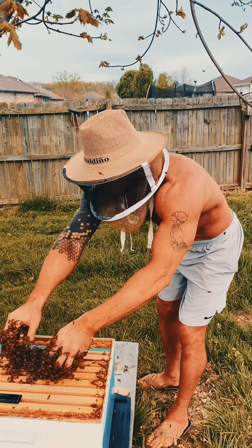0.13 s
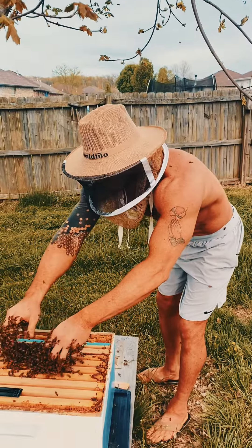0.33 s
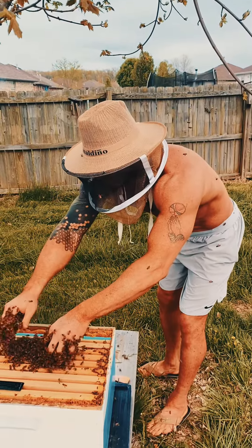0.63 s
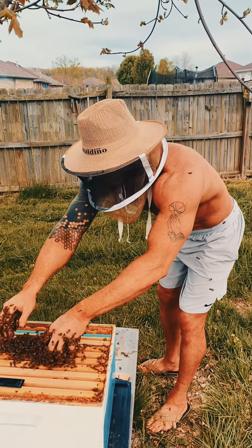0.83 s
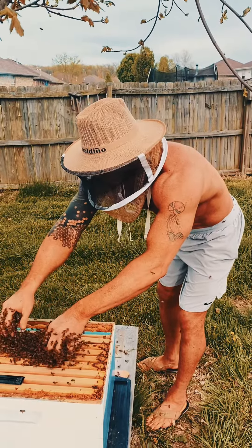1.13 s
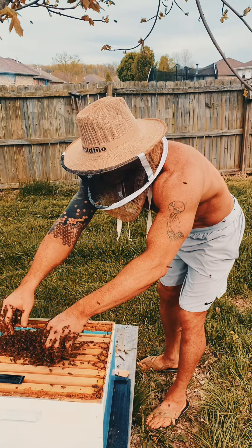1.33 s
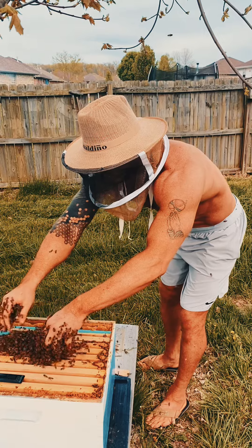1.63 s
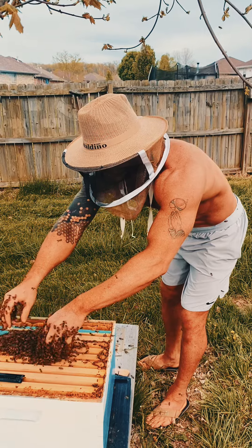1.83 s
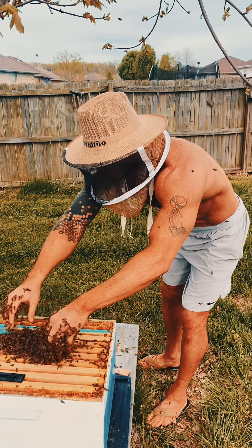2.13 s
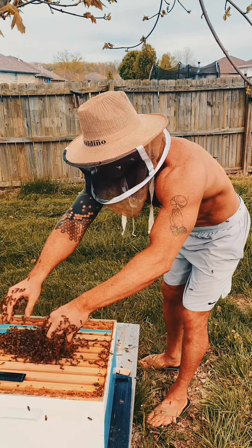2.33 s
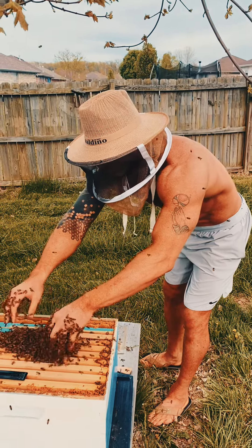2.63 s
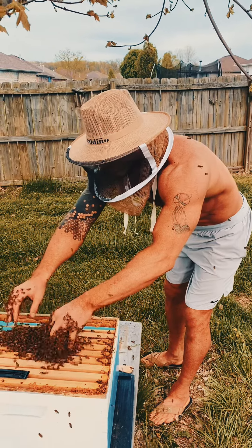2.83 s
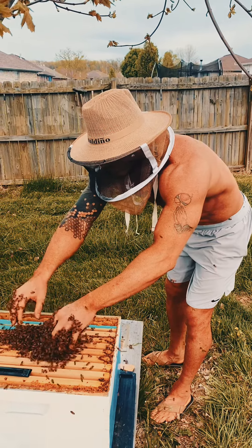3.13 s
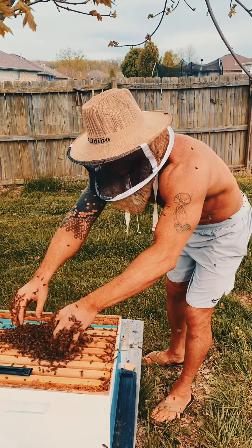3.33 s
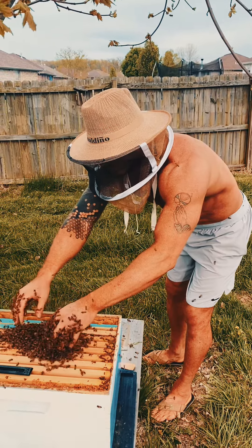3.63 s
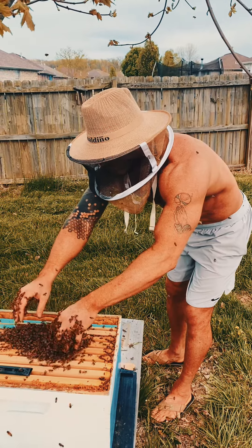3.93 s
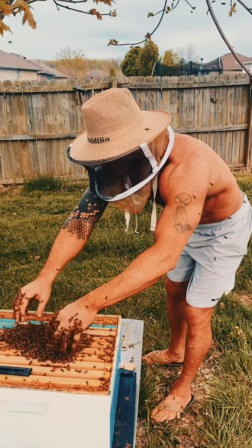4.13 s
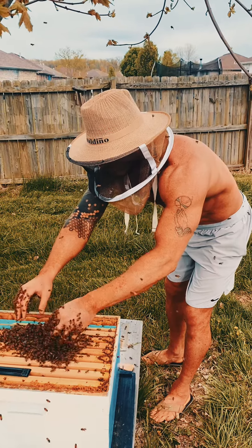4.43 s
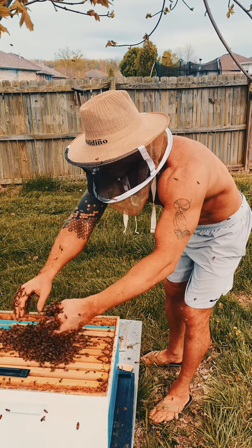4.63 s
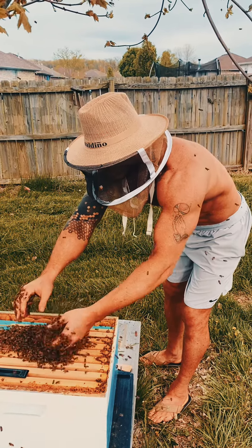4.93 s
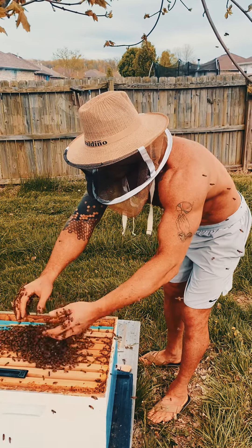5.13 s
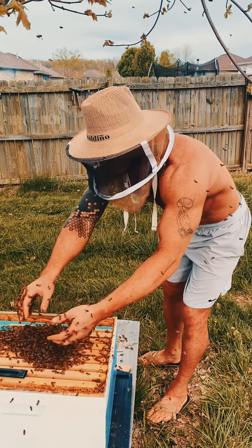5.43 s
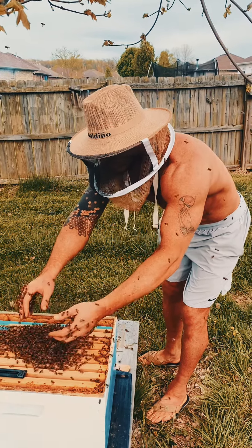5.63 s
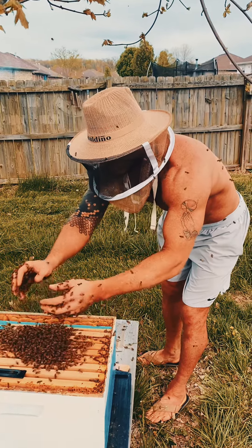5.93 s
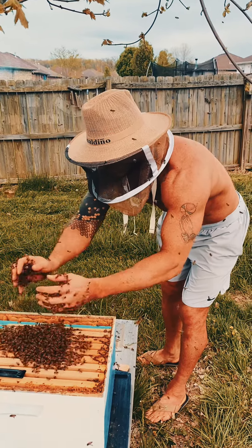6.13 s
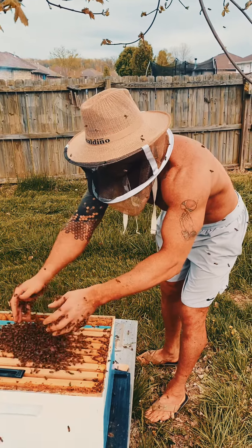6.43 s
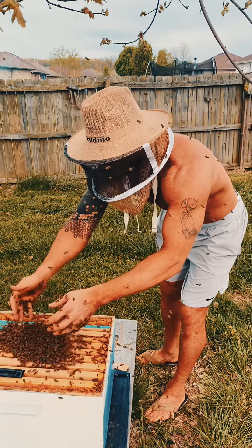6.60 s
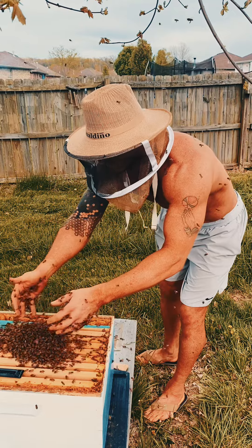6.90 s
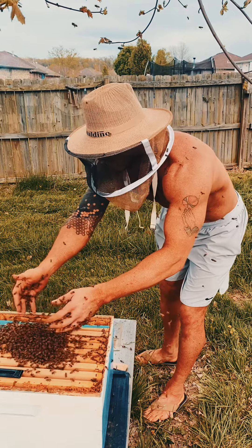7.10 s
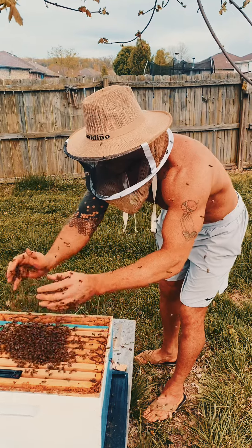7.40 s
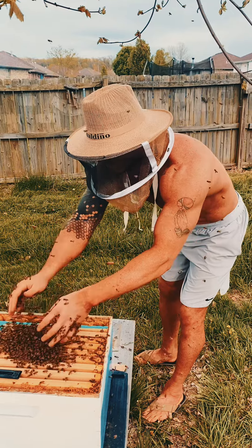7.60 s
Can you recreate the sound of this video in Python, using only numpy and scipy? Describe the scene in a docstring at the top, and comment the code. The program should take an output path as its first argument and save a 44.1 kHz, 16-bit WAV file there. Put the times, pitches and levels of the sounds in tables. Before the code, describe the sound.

A ride-on mower drones beyond a backyard fence, its low engine hum beating against the held tones of its blades. About two seconds in it revs up a little and stays there, slightly louder. A swarm of bees buzzes more faintly throughout, with a soft hiss of leaves. A few dull thumps and light gusts of wind bump the phone microphone.

```python
"""Ride-on mower and backyard hive.

A mower drones beyond the fence and revs up at about 2 s. Its twin-cylinder exhaust beats against the
tones of the belt-driven blades; the deck roars over a low rumble and dull thumps. Wing beats make the
swarm buzz, leaves hiss, a thin tone hangs far off. Light wind buffets the two ports of a phone."""
import sys
import numpy as np
from scipy import signal
from scipy.fft import rfft, irfft, next_fast_len
from scipy.io import wavfile
from scipy.ndimage import uniform_filter1d

SR = 44100
rng = np.random.default_rng(int(sys.argv[2]) if len(sys.argv) > 2 else 0)


def materialize(psi):
    """Save the field psi as 16-bit PCM at rate SR to the path in sys.argv[1].

    A 1-D psi becomes a single channel; in a 2-D psi each row is a channel.
    """
    bounded = np.clip(np.atleast_2d(psi).T, -1, 1)
    quanta = np.round(bounded * 32767).astype(np.int16)
    wavfile.write(sys.argv[1], SR, quanta)


N = 342216

# engine run: t/s, four-stroke cycle rate/Hz, exhaust level/dB
ENGINE_RUN = [(0.0, 23.61, -36), (0.35, 23.43, -37), (0.65, 23.1, -35.5), (1.2, 23.31, -34),
              (1.78, 23.14, -39.5), (2.0, 23.65, -31), (2.2, 25, -31.5), (2.4, 25.56, -34.5),
              (3.0, 24.97, -33.5), (3.45, 25.46, -31.5), (4.15, 25.34, -31.5), (4.7, 25.55, -32.5),
              (5.0, 25.42, -31.5), (5.5, 25.6, -32.5), (6.15, 25.45, -33), (6.4, 25.68, -32),
              (6.75, 25.4, -33.5), (7.4, 25.5, -31), (7.76, 25.42, -33)]
# exhaust tones: multiple of the cycle rate, relative level/dB, scatter/dB
EXHAUST_TONES = [(2, -7, 2), (3.006, -8, 2.5), (4.033, -14, 2.5), (5.004, -0.5, 0.65), (5.99, -9, -1.5),
                 (7.03, -18, 2.5), (8, -9, 0.9), (8.99, -16.5, -0.5), (10.02, -17.5, 1.5),
                 (11.05, -21.5, 2), (16.1, -35, -4), (16.87, -32, -1), (20.02, -23.5, 2), (23.98, -27, 1.5)]
# strong blade tones, swelling as the spindles slip: t/s, level/dB for each of STRONG_ORDERS
STRONG_BLADE_LEVELS = [(0.0, -36, -38, -38.5, -58), (0.4, -36, -38.5, -51.5, -50),
                       (0.65, -33, -38.5, -42.5, -55), (1.05, -34, -33, -47, -54),
                       (1.45, -34, -33.5, -51, -57), (1.85, -40, -35, -47, -58), (2.0, -39, -37, -41, -54),
                       (2.15, -36, -40, -37, -50), (2.3, -28.5, -43, -31, -68), (2.6, -33, -50, -33.5, -55),
                       (2.95, -28.5, -53, -39.5, -46.5), (3.3, -30.5, -42.5, -38.5, -58),
                       (3.65, -43, -41, -36.5, -55), (4.0, -45, -39, -37, -46.5),
                       (4.25, -39, -39, -37, -45), (4.6, -32, -53, -37, -65), (5.05, -31, -54, -38.5, -48),
                       (5.3, -29, -49, -41, -46.5), (5.65, -26, -38.5, -42, -44),
                       (5.9, -27.5, -38, -45, -45.5), (6.1, -26.5, -37, -45.5, -49),
                       (6.4, -24.5, -38, -42.5, -48), (6.8, -27, -37, -39.5, -45),
                       (7.05, -25, -39, -37.5, -42), (7.4, -24, -42, -37.5, -44),
                       (7.6, -26, -40, -34, -47.5), (7.76, -26, -48, -37, -48)]
# faint blade tones: t/s, level/dB for each of FAINT_ORDERS
FAINT_BLADE_LEVELS = [(0.0, -56, -55, -51, -53, -62), (0.35, -58, -59, -49, -60, -64),
                      (0.55, -61, -55, -61, -62, -64), (0.95, -59, -54, -58, -57, -64),
                      (1.15, -58, -60, -48, -60, -62), (1.45, -58, -55, -50.5, -58, -66),
                      (1.9, -57, -54, -49, -60, -64), (2.15, -58, -57, -60, -60, -64),
                      (2.5, -43, -49, -62, -58, -60), (3.05, -54, -54, -64, -60, -62),
                      (3.3, -53, -48, -48, -59, -54), (3.7, -42, -51, -52, -55, -59),
                      (4.0, -43, -54, -50.5, -54, -52), (4.4, -49, -50.5, -47, -53, -54),
                      (4.7, -43, -51, -63, -51, -60), (5.15, -45, -58, -60, -58, -62),
                      (5.6, -45.5, -59, -53, -55, -62), (5.95, -49, -53, -49.5, -60, -58),
                      (6.45, -51, -51, -47.5, -56, -52), (6.8, -58, -49.5, -60, -54, -55),
                      (7.3, -57, -55, -46.5, -50, -62), (7.76, -53, -50, -50, -56, -62)]
STRONG_ORDERS, FAINT_ORDERS = (1, 2, 3, 4), (1.5, 5, 6, 7, 8)  # x blade-pass rate
# deck roar: f/Hz, level/dB
ROAR_SPECTRUM = [(120, -10), (200, 2), (300, -1), (450, -1), (700, -2.5), (1000, -5), (1400, -8),
                 (1800, -12.5), (2500, -10.5), (3300, -16), (4200, -30)]
# narrow rings in the roar: f/Hz, width/Hz, level re roar/dB
ROAR_RINGS = [(1848, 27, -25), (2810, 57, -18)]
# rumble: f/Hz, level/dB
RUMBLE_SPECTRUM = [(25, -26), (35, -6), (45, -1.5), (65, -0.5), (95, -5.5), (150, -8.5), (250, -15.5),
                   (450, -29)]
# rumble: t/s, level/dB
RUMBLE_LEVELS = [(0.0, -38), (1.83, -38.5), (1.99, -30), (2.3, -40), (2.66, -36), (3.05, -32), (3.5, -45),
                 (3.8, -44), (4.0, -52), (4.15, -38), (4.36, -52), (4.62, -37), (4.76, -48), (4.9, -34),
                 (5.05, -46), (5.4, -42), (6.05, -49), (6.55, -40), (7.0, -48), (7.3, -47), (7.5, -35),
                 (7.61, -45), (7.76, -33)]
# dull thumps: peak t/s, level/dB, f/Hz
THUMP_EVENTS = [(1.984, -30, 65), (2.634, -27, 65), (2.706, -27, 60), (2.86, -26, 60), (3.025, -27, 60),
                (3.781, -33, 55), (4.092, -25.5, 70), (4.174, -27, 60), (4.481, -32, 60),
                (4.609, -27.5, 62), (5.391, -32, 60), (6.567, -32, 60), (7.51, -27, 70)]
# swarm buzz: f/Hz, level/dB
BUZZ_SPECTRUM = [(1200, -19.5), (1800, -6.5), (2250, -1.5), (2600, -1), (2850, 2), (3150, 0), (3400, -5),
                 (4500, -28)]
# swarm stirring as it is handled: t/s, level/dB
SWARM_LEVELS = [(0.0, -50), (0.3, -48), (1.8, -48), (2.25, -46), (3.3, -44.5), (4.0, -45.5), (4.7, -46.5),
                (5.5, -46.5), (6.3, -45), (6.7, -48), (7.76, -45.5)]
# short faint tone flecks at about 2-3 kHz, centred: peak t/s, level/dB, f/Hz
BRIEF_FLECKS = [(3.517, -49, 1900), (4.425, -52, 2600), (4.879, -50, 2350), (5.054, -52, 2825),
                (5.807, -53, 3175), (5.946, -53, 3175), (6.151, -53, 2800), (6.371, -53, 2800),
                (6.65, -49, 2475), (6.954, -50, 2325), (7.308, -50, 2825), (7.588, -49, 2450)]
# hiss: f/Hz, level/dB
HISS_SPECTRUM = [(2500, -12), (3600, 2), (4500, -1), (5300, 0), (6000, -4.5), (7000, -8), (8000, -14),
                 (9500, -24)]
# sheen, the top of the hiss: f/Hz, level/dB
SHEEN_SPECTRUM = [(5500, -12), (7000, 0), (8000, 0), (9600, -1), (12000, -2.5), (14500, -4.5), (16000, -6)]
# leaves stirring: peak t/s, sheen rise/dB, length/s
LEAF_RUSTLES = [(1.05, 1.5, .2), (2.22, 2, .25), (3.27, 2.5, 0.33), (5.133, 4, 0.28), (5.35, 1.5, .35),
                (6.44, 2.5, 0.37), (6.9, 1, .3), (7.72, 2.5, .15)]
# wind on the ports: t/s, level/dB
WIND_LEVELS = [(0.0, -49), (1.0, -46), (1.2, -43), (1.35, -50), (1.65, -55), (1.8, -46), (2.45, -43),
               (2.6, -38), (2.78, -52), (2.95, -44), (3.15, -50), (3.4, -64), (3.8, -47), (4.0, -45),
               (4.12, -34), (4.3, -49), (4.8, -57), (5.35, -43), (5.8, -58), (6.2, -51), (6.5, -37),
               (6.62, -42), (7.1, -47), (7.5, -33.5), (7.76, -40)]
# wind on the ports: f/Hz, level/dB
WIND_SPECTRUM = [(25, -16), (45, -2), (75, -2.5), (130, -4), (200, -10), (350, -16.5)]
# distant tone: t/s, relative level/dB
WHINE_LEVELS = [(0.0, -3), (3.0, -2), (4.0, 1), (7.76, 3)]
# port pair: f/Hz, left minus right/dB, coherence/0-1, left lead/rad
PORT_RESPONSE = [(40, -0.5, 1, 0), (120, -0.1, 1, -0.02), (230, -.5, 0.98, 0.09), (350, 0.5, 0.8, 0.5),
                 (520, 4, 0.82, 0.6), (785, 4.5, 0.86, 1.3), (1100, 5.5, 0.66, 0.5), (1480, 3, 0.85, 0.73),
                 (1870, -1.5, 0.48, 1.27), (2290, -1, 0.78, 1.85), (2740, -3.5, 0.73, 2.5),
                 (3170, 0, 0.81, 2), (3540, -0.5, 0.5, 2.5), (4240, 2, 0.8, 1.36), (5360, -1, 0.45, 0.38),
                 (6390, 0, 0.24, 2), (6790, 2, 1, 3.5), (7910, -2.5, 1, 3), (9670, 2, 0.87, 6.5),
                 (11340, -1.5, 0.92, 6.5), (12970, 1, 0.95, 10), (14300, -1, .99, 9.5),
                 (15800, 0, .9, 12.5)]

IDLE_HZ, REVVED_HZ, PASSES_PER_CYCLE = 23.6, 25.2, 4.44
THROTTLE_S, OPENING_S = 1.85, 0.35  # start, duration
TIME_S = np.arange(N) / SR


def exhaust(cycles, level_db, revs, surge_db=4.5, surge_decay_s=0.5):
    """Unevenly firing twin: no two firings are alike; the two lowest tones bark as it gathers speed."""
    since_open_s = np.maximum(TIME_S - THROTTLE_S - OPENING_S, 0)
    bark_db = surge_db * throttle() * np.exp(-since_open_s / surge_decay_s)
    swell_db = {2: bark_db, 3: bark_db, 6: blend_db(revs, idle_db=1, full_db=-5.5),
                8: blend_db(revs, idle_db=-2.5, full_db=0) + 1.2 * wander(3.01)}
    out = np.zeros(N)
    for order, db, scatter_db in EXHAUST_TONES:
        tone_db = level_db + db + swell_db.get(round(order), 0) + scatter_db * wander(12)
        out += gain(tone_db) * tone(order * cycles)
    return out


def blades(passes, flutter_db=0.7, waver_turns=0.02):
    """Blade-pass tones, shaken by turbulence under the deck; blade speed hunts around the belt's."""
    levels_db = over_time(STRONG_BLADE_LEVELS) + over_time(FAINT_BLADE_LEVELS)
    out = np.zeros(N)
    for order, db in zip(STRONG_ORDERS + FAINT_ORDERS, levels_db):
        amplitude = gain(db + flutter_db * wander(11))
        out += amplitude * tone(order * (passes + waver_turns * wander(9)))
    return out


def deck_roar(passes):
    """Ringing deck noise: throbs with the blades, grows with the throttle."""
    throb = 1 + 0.05 * tone(passes)
    level_db = blend_db(throttle(), idle_db=-41, full_db=-38) + 0.55 * wander(6)
    broadband = noise(ROAR_SPECTRUM)
    rings = sum(gain(db) * ring(hz, width_hz) for hz, width_hz, db in ROAR_RINGS)
    return gain(level_db) * throb * (broadband + rings)


def rumble():
    """Low noise with an uneven level."""
    return gain(over_time(RUMBLE_LEVELS)[0] + 1.5 * wander(14)) * noise(RUMBLE_SPECTRUM)


def swarm(count=14, sharpness=0.9, fleck_db=-8):
    """Bees near and far: one sharp pressure pulse per wing beat; pitch and level shift as they turn."""
    pulses = np.zeros((2, N))
    for bee in range(count):
        waver = 0.017 * wander(5)
        nearness_db = 4.2 * wander(16)
        beat_hz = (235 + 22 * rng.standard_normal()) * (1 + waver)
        stroke = np.cos(2 * np.pi * np.cumsum(beat_hz) / SR)
        pulses[bee % 2] += gain(nearness_db) / (1 + sharpness ** 2 - 2 * sharpness * stroke)
    buzz = colour(pulses, BUZZ_SPECTRUM) + gain(fleck_db) * tone_flecks()
    return gain(over_time(SWARM_LEVELS)[0]) * buzz


def tone_flecks(rate_hz=30, length_s=0.03):
    """Brief gliding tone flecks at random pitches, 1.5-3.3 kHz, scattered through the buzz."""
    out = np.zeros((2, N))
    t = np.arange(-2 * length_s, 2 * length_s, 1 / SR)
    for when, pitch, glide, size in rng.random((int(rate_hz * N / SR), 4)):
        hz = 1500 + 1800 * pitch
        start = int(when * (N - len(t)))
        turns = hz * t * (1 + (glide - 0.5) * t)
        out[0, start:start + len(t)] += size * swell(t, length_s) * np.sin(2 * np.pi * turns)
    return out / out[0].std()


def leaf_hiss(sheen_db=-57.5):
    """Two hiss bands swell as leaves stir; the lower also steps up as the throttle opens."""
    rustle_db = sum(db * swell(TIME_S - peak_s, length_s) for peak_s, db, length_s in LEAF_RUSTLES)
    hiss_db = blend_db(throttle(rise_s=0.1), idle_db=-54, full_db=-50.5)
    hiss = gain(hiss_db + 0.29 * rustle_db + 0.68 * wander(10)) * noise(HISS_SPECTRUM)
    sheen = gain(sheen_db + rustle_db + 0.8 * wander(12)) * noise(SHEEN_SPECTRUM)
    return hiss + sheen


def wind():
    """Gusts buffet each port with its own noise."""
    return gain(over_time(WIND_LEVELS)[0] + 2.0 * wander(20)) * noise(WIND_SPECTRUM)


def distant_whine(hz=764.5, base_db=-57.5):
    """Faint held tone, fading in and out."""
    return gain(base_db + over_time(WHINE_LEVELS)[0] + 2.7 * wander(3.27)) * tone(hz * TIME_S)


def ports(tones, noise_pair):
    """The phone's body shades and delays each port; noise row 0 is shared, row 1 sets them apart."""
    size = next_fast_len(N)
    pan_db, coherence, lead_rad = over_hz(PORT_RESPONSE)
    coherence = np.clip(coherence, 0, 1)
    side = np.array([[1], [-1]])
    shared, apart = rfft(noise_pair, size)
    diffuse = np.sqrt((1 + coherence) / 2) * shared + side * np.sqrt((1 - coherence) / 2) * apart
    response = gain(side * pan_db / 2) * np.exp(0.5j * side * lead_rad)
    return irfft((rfft(tones, size) + diffuse) * response, size)[:, :N]


def bursts(events, length_s):
    """Short tones that swell and fade around their peaks."""
    out = np.zeros(N)
    for (peak_s, db, hz), phase_turns in zip(events, rng.random(len(events))):
        span = slice(int((peak_s - 2 * length_s) * SR), int((peak_s + 2 * length_s) * SR))
        envelope = np.sqrt(2) * gain(db) * swell(TIME_S[span] - peak_s, length_s)
        out[span] += envelope * np.sin(2 * np.pi * (hz * TIME_S[span] + phase_turns))
    return out


def throttle(rise_s=OPENING_S):
    """Ramp 0 to 1 from THROTTLE_S."""
    return np.clip((TIME_S - THROTTLE_S) / rise_s, 0, 1)


def blend_db(amount, idle_db, full_db):
    """Level from idle (0) to full (1)."""
    return idle_db + (full_db - idle_db) * amount


def gain(db):
    """Decibels to amplitude."""
    return 10 ** (np.asarray(db) / 20)


def swell(t, length_s):
    """Gaussian, length_s wide at 1/e."""
    return np.exp(-(2 * t / length_s) ** 2)


def over_time(table):
    """Table columns, one value per sample."""
    times_s, *columns = np.transpose(table)
    return [np.interp(TIME_S, times_s, column) for column in columns]


def over_hz(table):
    """Table columns, one value per FFT bin."""
    hz, *columns = np.transpose(table)
    log_bins = np.log(np.maximum(np.fft.rfftfreq(next_fast_len(N), 1 / SR), 1))
    return [np.interp(log_bins, np.log(hz), column) for column in columns]


def wander(rate_hz):
    """Random steps, smoothed twice; spread near 1."""
    hold = int(SR / rate_hz)
    steps = np.repeat(rng.standard_normal(N // hold + 1), hold)
    return 1.47 * uniform_filter1d(uniform_filter1d(steps, hold), hold)[:N]


def tone(turns):
    """Sine with random start phase, rms 1."""
    return np.sqrt(2) * np.sin(2 * np.pi * (turns + rng.random()))


def colour(pair, spectrum):
    """Two signals shaped by a spectrum, closed an octave beyond its ends; rms 1."""
    closed = [(spectrum[0][0] / 2, -80), *spectrum, (spectrum[-1][0] * 2, -80)]
    size = next_fast_len(N)
    shaped = irfft(rfft(pair, size) * gain(over_hz(closed)[0]), size)[:, :N]
    return shaped / shaped.std()


def noise(spectrum):
    """Two independent noises of one colour."""
    return colour(rng.standard_normal((2, N)), spectrum)


def ring(hz, width_hz):
    """Two noises through one narrow resonance, rms 1."""
    pair = signal.lfilter(*signal.iirpeak(hz, hz / width_hz, fs=SR), rng.standard_normal((2, N)))
    return pair / pair.std()


def scene():
    """Mower, bees, leaves and wind at the two ports."""
    cycle_hz, exhaust_db = over_time(ENGINE_RUN)
    cycles = np.cumsum(cycle_hz) / SR
    passes = PASSES_PER_CYCLE * cycles
    revs = np.clip((cycle_hz - IDLE_HZ) / (REVVED_HZ - IDLE_HZ), 0, 1)
    peak_revs = np.maximum.accumulate(revs)
    tones = exhaust(cycles, exhaust_db, peak_revs) + blades(passes) + distant_whine()
    thumps = bursts(THUMP_EVENTS, length_s=0.033)
    noise_pair = rumble() + deck_roar(passes) + leaf_hiss() + swarm()
    return ports(tones + thumps, noise_pair) + wind() + bursts(BRIEF_FLECKS, length_s=0.024)


def record(dry):
    """The phone's steep low-pass."""
    cutoff_hz = 15720
    return signal.sosfilt(signal.ellip(16, 0.3, 70, cutoff_hz, fs=SR, output="sos"), dry)


dry = scene()
out = record(dry)
materialize(out)
```